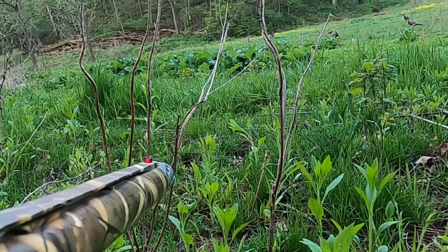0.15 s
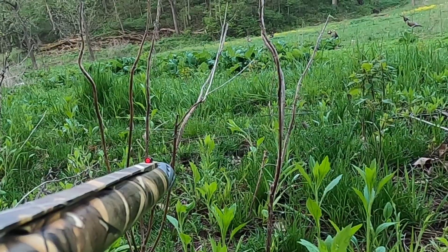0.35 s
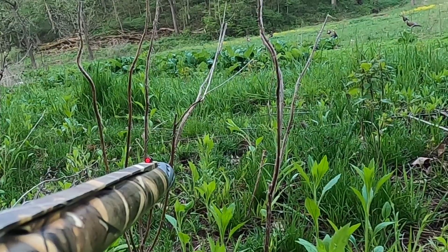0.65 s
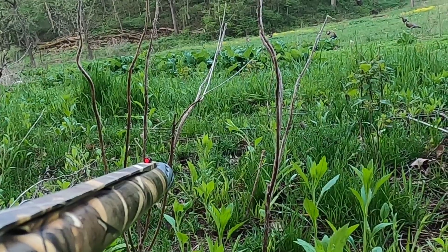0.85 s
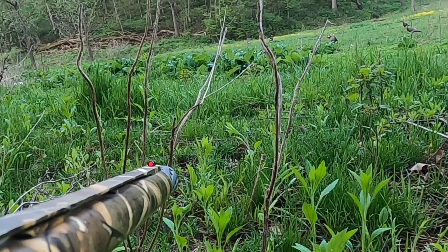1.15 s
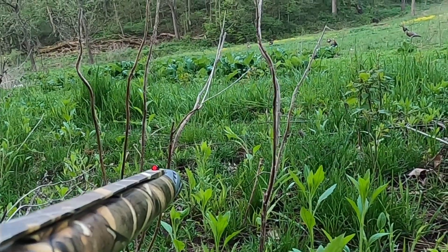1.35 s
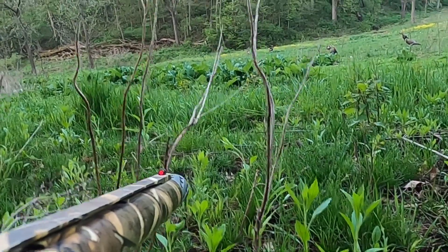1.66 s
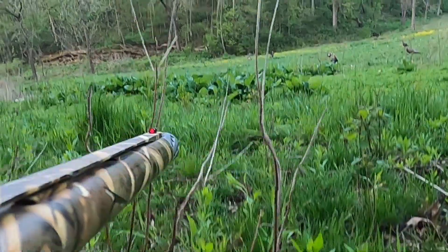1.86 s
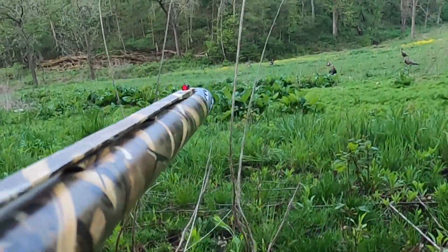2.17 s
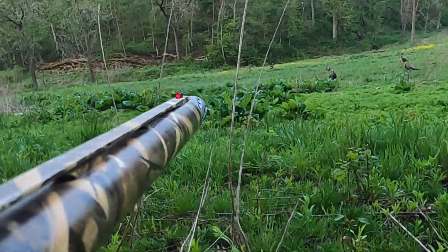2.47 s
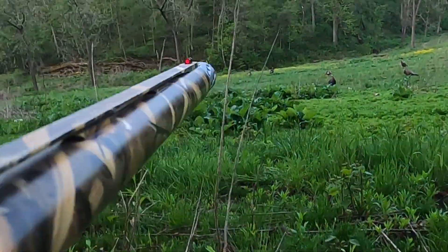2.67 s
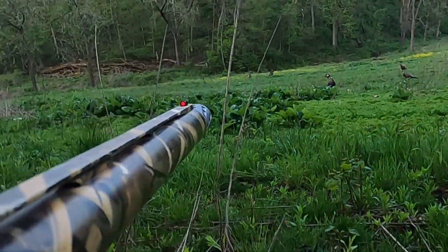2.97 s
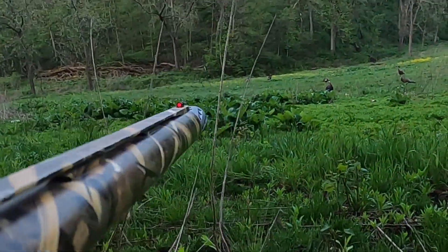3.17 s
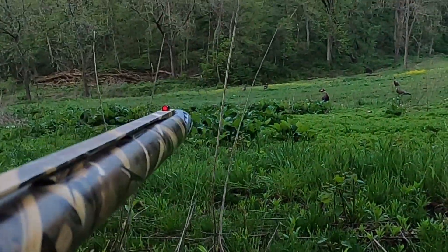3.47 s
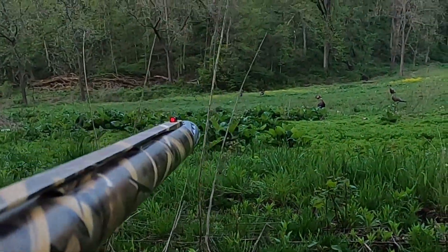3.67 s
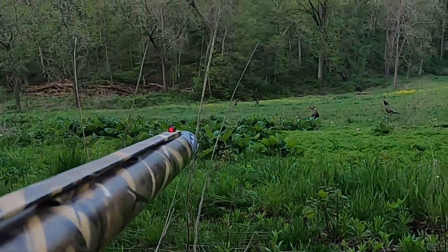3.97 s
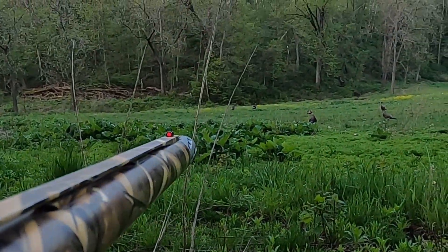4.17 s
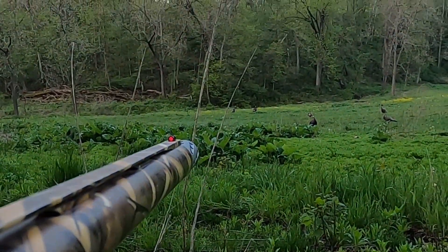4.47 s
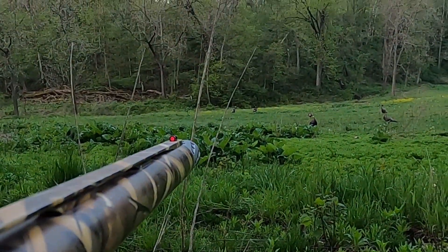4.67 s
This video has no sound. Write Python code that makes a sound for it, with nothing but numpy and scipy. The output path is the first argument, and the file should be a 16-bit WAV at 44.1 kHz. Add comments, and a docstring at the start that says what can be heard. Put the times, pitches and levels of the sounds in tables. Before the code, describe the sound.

A lively dawn chorus: one loud bird repeats quick syllables in the first second, another answers more faintly, and fluting whistles carry on throughout, echoing off trees. Close to the microphone, a gun slides and bumps softly between roughly two and three and a half seconds, then a bright, short metal click snaps at four seconds. No shot follows; birdsong continues in wide stereo.

```python
"""Songbirds whistle, chirp and buzz over a distant chorus and still air at dawn, by a wooded field;
a turkey gobbles faintly far off. Close by, a shotgun rubs and knocks as it is raised, then clicks.
Birds are gliding tones or bands of noise; sparse random echoes stand for the trees.
Rubs are grainy noise, part of it ringing the gun's low modes; knocks are dulled rings of its modes.
The click adds a noise crack, a bright steel ring and a low ring of the whole gun."""
import sys
import numpy as np
from scipy import signal
from scipy.fft import rfft, irfft
from scipy.io import wavfile

SR = 44100
rng = np.random.default_rng(int(sys.argv[2]) if len(sys.argv) > 2 else 0)


def inscribe(sig):
    """Save sig as 16-bit PCM at rate SR to the path in sys.argv[1].

    A 1-D sig is mono; a 2-D sig holds one channel per row.
    Samples are clipped to [-1, 1] before scaling.
    """
    pcm = np.round(np.clip(np.atleast_2d(sig).T, -1, 1) * 32767)
    wavfile.write(sys.argv[1], SR, pcm.astype(np.int16))


N = 212606
TIME_S = np.arange(N) / SR
RIGHT_LEAD_SAMPLES = 5  # far sound
EDGE_HZ = 13900
CHIRP_LENGTH_S, RASP_HZ = 0.032, 12830

# Event levels are relative: gains shared by a whole source come on top.
# Single notes, start and end over middle pitch. name: (start_ratio, end_ratio)
SHAPES = {"held": (1.008, 1), "sag": (1.035, .94), "scoop": (1.085, 1.0), "dip": (1.035, 1.045),
          "fall": (1.15, .88), "rise": (.89, 1.1), "dive": (1.23, .81), "flick": (0.75, 1.2)}
# Thin slurs from the open field: start_s, length_s, pitch_hz, level_db, left_minus_right_db, shape
SLURS = [(.003, 0.052, 3570, -51, 6.5, "fall"), (0.281, .04, 3940, -59, 7, "held"),
         (0.069, 0.28, 4874, -60.5, 12, "held"), (.225, .026, 6980, -66, -7, "dive"),
         (.088, 0.056, 7320, -56, 3, "scoop"), (0.162, 0.1, 6800, -64.5, -15, "fall"),
         (0.553, 0.032, 6800, -57.5, 15, "rise"), (0.561, .14, 8310, -77, -2, "held"),
         (0.888, .12, 6430, -72, 15, "sag"), (1.084, 0.053, 7710, -77.5, 2, "held"),
         (1.204, 0.017, 4350, -52, -9, "rise"), (1.24, 0.056, 5860, -68.5, 10.5, "rise"),
         (1.415, .047, 5622, -62, 10, "rise"), (2.017, .12, 4540, -70, 20.5, "flick"),
         (2.02, .08, 5460, -68, -9, "rise"), (2.443, .06, 5820, -69, 8, "sag"),
         (2.438, .09, 4210, -70, 10, "dip"), (3.026, .11, 4140, -66, 11, "scoop"),
         (3.931, .025, 4680, -67, -15, "fall"), (3.99, 0.077, 7680, -74, 9, "rise"),
         (4.097, 0.13, 7560, -72.5, 0, "rise")]
# Fluting carol: start_s, length_s, pitch_hz, level_db, shape
CAROL = [(.06, 0.2, 2853, -58, "scoop"), (0.106, 0.1146, 1918, -63.5, "held"),
         (0.35, 0.052, 2245, -56.5, "dip"), (.565, .063, 3140, -54.5, "held"),
         (0.634, 0.15, 2245, -53.5, "scoop"), (.8, .065, 2446, -50, "sag"), (1.14, .08, 1673, -68, "rise"),
         (1.165, 0.029, 2230, -56.5, "rise"), (1.201, 0.095, 2045, -55.5, "scoop"),
         (1.301, 0.026, 1797, -56, "rise"), (1.413, 0.056, 1560, -65.5, "fall"),
         (1.524, 0.054, 2370, -50.5, "scoop"), (1.642, 0.05, 3080, -52, "held"),
         (1.691, 0.064, 2513, -58.5, "fall"), (1.762, 0.073, 2155, -51.5, "held"),
         (1.79, .05, 1880, -63.5, "sag"), (1.789, .07, 3065, -53.5, "held"),
         (1.877, 0.044, 2680, -56, "held"), (1.955, .03, 2130, -58.5, "dip"),
         (1.998, 0.055, 2546, -54, "scoop"), (2.03, .13, 1483, -70, "dip"),
         (2.359, 0.055, 2650, -54, "sag"), (2.409, 0.061, 2330, -52.5, "sag"),
         (2.533, 0.034, 2217, -54, "sag"), (2.597, .06, 3470, -61, "held"),
         (2.755, 0.038, 2456, -52, "scoop"), (2.839, 0.032, 3370, -50.5, "scoop"),
         (2.947, 0.059, 2592, -52, "fall"), (3.012, .045, 2670, -54, "rise"),
         (3.109, 0.062, 2230, -54.5, "held"), (3.283, 0.078, 2850, -46.5, "held"),
         (3.341, 0.035, 2990, -53.5, "sag"), (3.393, 0.071, 2975, -49, "scoop"),
         (3.467, .038, 3240, -44.5, "sag"), (3.502, 0.044, 2724, -41.5, "scoop"),
         (3.61, 0.041, 2430, -51, "scoop"), (3.611, .1, 1902, -52, "rise"), (3.797, 0.11, 3950, -49, "sag"),
         (3.739, 0.1, 1935, -62, "held"), (3.799, 0.069, 2595, -42.5, "dip"),
         (3.889, 0.043, 3540, -40, "held"), (3.964, 0.075, 2373, -54, "dip"),
         (4.085, 0.045, 3230, -45, "dip"), (4.145, 0.074, 3145, -50, "held"),
         (4.172, 0.067, 2370, -53.5, "scoop"), (4.275, 0.1, 2098, -56, "dip"),
         (4.391, 0.05, 2545, -56, "dip"), (4.476, .055, 2964, -54, "held"),
         (4.525, 0.055, 2570, -55.5, "sag"), (4.583, .05, 2910, -56, "held"),
         (4.667, 0.071, 2650, -56, "scoop"), (4.731, 0.043, 2250, -57.5, "rise"),
         (4.793, 0.033, 2430, -54, "scoop")]
# Quick chirps: start_s, pitch_hz, level_db, left_minus_right_db, shape
CHIRPS = [(0.111, 3210, -57.5, 13, "rise"), (0.751, 1750, -63, 12.5, "rise"),
          (2.489, 2583, -60.5, 15, "fall"), (2.727, 3020, -51.5, 1, "dive"),
          (3.095, 3300, -59, 16, "flick"), (3.12, 3297, -52.5, 13, "dive"),
          (3.241, 1620, -63.5, -2, "fall"), (3.29, 1820, -64, -1.5, "scoop"),
          (3.652, 3380, -56.5, 10.5, "dive"), (3.863, 3130, -47, 6, "flick")]
# Songs of repeated syllables: first_s, repeats, period_s, length_s, start_hz, middle_hz, end_hz,
# level_db, change_db_per_repeat
# Loud bird among the trees
LOUD_SONG = [(0.51, 2, .143, 0.016, 8650, 5440, 4100, -57, -2.5),
             (0.4, 2, 0.12, .028, 7600, 4900, 3400, -49.5, -11.5),
             (.5, 2, 0.12, 0.022, 4400, 4100, 3100, -46, -2),
             (.675, 4, 0.14, 0.046, 2430, 3450, 3700, -49, 0),
             (.74, 3, .1365, .017, 5820, 5000, 3750, -46, -1.5),
             (.762, 3, 0.13, 0.023, 5700, 3900, 3060, -47, 1.5),
             (0.44, 3, .135, 0.01, 5950, 6600, 4200, -49, -9),
             (.79, 3, .1365, .018, 5200, 4500, 3600, -55, 0),
             (.47, 2, .06, 0.03, 2900, 5000, 4030, -55.5, -2.5),
             (1.14, 3, 0.081, 0.027, 4760, 3480, 2850, -51, -0.5)]
# Second bird, a like song from the open; same columns
ANSWER_SONG = [(1.143, 2, .16, .012, 7450, 6206, 4860, -72, 1.5),
               (1.163, 2, .227, 0.032, 6850, 6140, 5070, -73.5, -0.5),
               (1.487, 1, 0, 0.025, 7390, 5008, 4000, -61, 6),
               (1.545, 4, .128, 0.06, 6540, 4780, 3720, -67, -1),
               (1.592, 2, 0.096, 0.019, 3725, 4510, 4740, -56, 0.5),
               (1.748, 3, .1245, 0.012, 7170, 5145, 3350, -62, 0.5),
               (1.815, 3, .126, 0.023, 3270, 3875, 4020, -59.5, 1),
               (2.122, 4, .0835, .025, 4307, 3385, 2560, -64.5, 1.5)]
# Third bird, one even trill; same columns
EVEN_TRILL = [(.39, 6, .058, 0.032, 6250, 4656, 3860, -58, 0.021)]
# Distant chorus, level over time: time_s, level_db
CHORUS_LEVEL = [(0.0, -54.5), (0.59, -64), (0.87, -64.5), (1.19, -53.5), (1.53, -60.5), (1.87, -55),
                (2.07, -57.5), (3.36, -55.5), (3.46, -55), (4.07, -48.5), (4.28, -55), (4.82, -58.5)]
# Chorus spectrum: freq_hz, gain_db
CHORUS_COLOUR = [(1000, -41.5), (1500, -22.5), (1900, -8.5), (2300, -0.5), (2900, 2), (3500, -3.5),
                 (4500, -13), (7000, -47), (9000, -55)]
# Buzzy phrases: start_s, length_s, centre_hz, width_hz, level_db
BUZZES = [(0, 0.13, 5800, 1290, -59), (0.063, 0.33, 5030, 1200, -56), (0.021, 0.5, 3500, 600, -59),
          (0.207, 0.083, 7500, 620, -64), (0.274, 0.27, 5300, 1320, -63), (0.535, 0.12, 6940, 558, -57.5),
          (2.617, 0.18, 6140, 1110, -73.5), (2.973, .26, 6770, 446, -75.5), (3.233, 0.12, 1710, 250, -70),
          (3.839, 0.21, 7220, 837, -70), (4.071, .24, 6100, 1390, -65.5)]
# Faint, very high rasps: middle_s, level_db
RASPS = [(1.9, -72), (2.13, -72), (2.29, -70), (2.43, -68.5), (2.97, -67.5), (3.14, -68), (3.39, -71),
         (4.412, -72.5), (4.59, -70.5), (4.82, -74)]
# Still air spectrum: freq_hz, level_db_per_hz
AIR_COLOUR = [(20, -22.5), (50, -3), (100, -11.5), (165, 6.5), (250, -1), (500, -8), (900, -11.5),
              (1500, -5.5), (3000, -9), (5000, -12), (7000, -20.5), (9000, -27), (12000, -44.5),
              (14000, -42.5)]
# Likeness of the two channels for far sound: freq_hz, likeness_0_to_1
LIKENESS = [(30, 0), (150, 0), (1000, 0.12), (2500, 0), (4000, 0), (8000, 0)]
# Low modes of the gun and its mount: freq_hz, level_db, t60_s
BODY_MODES = [(111.3, -23, 0.39), (164, -20, 0.14), (235, -35, .13), (273, -11.5, 0.14), (423, -17, 0.14),
              (480, -2, 0.09), (569.4, 1, 0.084), (696.4, -2, 0.089), (826, -8, 0.099), (1031, 5.5, 0.052)]
# Bright modes of the steel parts: freq_hz, level_db, t60_s
STEEL_MODES = [(1477, -7.5, 0.097), (2060, 0, 0.027), (2147, 10, 0.016), (3180, 1, 0.014),
               (3530, -3.5, 0.017), (4720, -14, 0.021), (5820, -14, 0.016), (6880, -16, 0.022),
               (7620, -31, 0.013), (8690, -18, 0.0147), (10400, -34, 0.0047)]
# Stereo balance of the gun: freq_hz, left_minus_right_db
GUN_BALANCE = [(60, 17.5), (110, -3.5), (200, -8.5), (370, -10.5), (680, -7), (1240, 4), (2270, -2),
               (4170, 23), (7000, 23), (8600, 0), (12000, 2.5)]
# Gun sliding on its rest: full_pressure_s, swell_s, hold_s, level_db
STROKES = [(0.054, 0.15, 0.1, -66.5), (1.296, .06, 0.083, -70), (1.846, 0.053, .025, -56.5),
           (2.225, 0.018, 0.0063, -73), (2.545, 0.048, 0.094, -50.5), (2.955, 0.14, 0.068, -50.5),
           (3.408, 0.028, .02, -57.5), (3.577, .12, 0.037, -59.5)]
SWELL_DB, STROKE_FALL_DB_PER_S = 18.5, 181  # rise over one swell_s; fall after the hold
LIFT_CREEP = (1.8, 0.45, 1.85, -71.5)  # soft creep while raised; columns as STROKES
# Rub spectrum: freq_hz, level_db_per_hz
RUB_COLOUR = [(30, -8.5), (110, -13), (180, -17.5), (280, 5.5), (370, -11), (490, 5), (600, 0),
              (800, -28.5), (1100, -6), (1600, -17), (3000, -13), (8000, -46)]
# Sleeve brushing as the arm lifts, level over time: time_s, level_db
SLEEVE_LEVEL = [(1.5, -81.5), (1.9, -70), (2.25, -76.5), (2.55, -85), (2.85, -68), (3.15, -77),
                (3.45, -72.5), (3.65, -101)]
# Soft handling knocks: start_s, level_db, lowpass_hz
KNOCKS = [(2.226, -49, 200), (2.372, -50.5, 2000), (2.55, -43, 594), (2.576, -42, 513), (3.411, -38, 1450),
          (3.462, -46.5, 1500)]
# Dull bumps of the mount: start_s, level_db, pitch_hz
BUMPS = [(2.091, -44.5, 43.7), (2.223, -40, 212), (2.237, -53, 150), (2.239, -57, 54.4), (2.569, -46, 68),
         (2.77, -57.5, 38.8), (2.938, -48.5, 37.2)]
# Catch snaps over, chatters and seats: start_s, level_db
CLICK = [(4.0499, 0), (4.0506, -17.5), (4.0516, -14)]
# Crack of steel on steel, spectrum: freq_hz, level_db_per_hz
CRACK_COLOUR = [(500, -19.5), (1000, -3.5), (1300, -14), (1500, 0.5), (1750, -6.5), (2150, -4.5),
                (2700, -4), (3400, -10), (4500, -19.5), (7000, -18), (9000, -26), (11000, -31.5),
                (14000, -44)]


def gain_of(db):
    """Decibels to amplitude gain."""
    return 10 ** (np.asarray(db) / 20)


def evened(x):
    """Scale to rms 1."""
    return x / np.sqrt(np.mean(x ** 2) + 1e-20)


def read(points, hz):
    """Interpolate a curve on a log-frequency axis."""
    f, value = np.transpose(points)
    return np.interp(np.log(hz + 1), np.log(f + 1), value)


def add(mix, start_s, sound):
    """Add a stereo sound in place, cropped at the end of the mix."""
    part = mix[:, max(round(start_s * SR), 0):][:, :sound.shape[1]]
    part += sound[:, :part.shape[1]]


def panned(balance_db):
    """Left and right gains, half the balance on each side."""
    left_db = np.atleast_1d(balance_db)
    return gain_of(np.array([left_db, -left_db]) / 2)


def coloured(x, gain):
    """Filter by a gain given as a function of frequency."""
    size = x.shape[-1]
    return irfft(rfft(x) * gain(np.fft.rfftfreq(size, 1 / SR)), size)


def bell(centre_hz, width_hz):
    """Gaussian band as a gain function of frequency."""
    return lambda f: np.exp(-.5 * ((f - centre_hz) / width_hz) ** 2)


def wander(size, rate_hz):
    """Smooth random motion: lowpassed noise, rms near 1."""
    noise = rng.standard_normal(size + 8192)
    return evened(coloured(noise, lambda f: np.exp(-(f / rate_hz) ** 2)))[:size]


def without_bass(x, edge_hz):
    """Highpass: small parts cannot radiate low frequencies."""
    return signal.sosfilt(signal.butter(2, edge_hz, "highpass", fs=SR, output="sos"), x)


def from_field(pair):
    """Far sound: channels partly alike by frequency, the right one ahead."""
    a, b = rfft(pair)
    hz = np.fft.rfftfreq(pair.shape[1], 1 / SR)
    same = np.clip(read(LIKENESS, hz), 0, 1)
    right = same * a + np.sqrt(1 - same ** 2) * b
    right = right * np.exp(2j * np.pi * hz * RIGHT_LEAD_SAMPLES / SR)
    return irfft(np.array([a, right]), pair.shape[1])


def field_noise(size):
    """White noise with the stereo image of far sound."""
    return from_field(rng.standard_normal((2, size)))


def far_noise(gain):
    """Full-length far noise with a given spectrum, rms 1."""
    return evened(coloured(field_noise(N), gain))


def woods(x, t60_s, onset_s, balance_db, trunks_per_s=1500):
    """Trunks and leaves scatter a sound into sparse random echoes that swell and die."""
    t = np.arange(SR) / SR
    hits = rng.random(SR) < trunks_per_s / SR
    taps = np.sign(rng.standard_normal((2, SR))) * hits
    tail = from_field(taps * (1 - np.exp(-t / onset_s)) * gain_of(-60 * t / t60_s))
    tail /= np.linalg.norm(tail, axis=1, keepdims=True)
    mono = x.mean(0)[None]
    return signal.fftconvolve(mono, tail, axes=1)[:, :N] * panned(balance_db)


def carried(x, direct_db, near_db, tail_db, t60_s, balance_db, near_t60_s=0.092, near_trunks_per_s=260):
    """A bird arrives direct, doubled by nearby trunks, and as an echo of the wood."""
    near = woods(x, near_t60_s, onset_s=.002, balance_db=balance_db, trunks_per_s=near_trunks_per_s)
    tail = woods(x, t60_s, onset_s=0.0052, balance_db=balance_db)
    return gain_of(direct_db) * x + gain_of(near_db) * near + gain_of(tail_db) * tail


def sing(notes, waver, flutter_db, edge):
    """Near-pure tones on quadratic pitch glides, with random pitch waver and level flutter."""
    out = np.zeros((2, N))
    for start_s, length_s, start_hz, middle_hz, end_hz, level_db, balance_db in notes:
        size = int(max(length_s, .005) * SR * 1.1)
        u = np.linspace(-.05, 1.05, size)  # glide overhangs 5 % at each end
        hz = np.polyval(np.polyfit([0, .5, 1], [start_hz, middle_hz, end_hz], 2), u)
        turns = np.cumsum(hz * (1 + waver * wander(size, 210))) / SR
        taper = signal.windows.tukey(size, np.clip(edge, .1, 1))
        shape = evened(taper * gain_of(flutter_db * wander(size, 160)))
        right_turns = turns + hz * RIGHT_LEAD_SAMPLES / SR
        tone = np.sqrt(2) * np.sin(2 * np.pi * np.array([turns, right_turns]))
        add(out, start_s - length_s / 20, gain_of(level_db) * shape * tone * panned(balance_db))
    return out


def note(start_s, length_s, hz, level_db, balance_db, shape):
    """One note of a named shape around its middle pitch."""
    start_ratio, end_ratio = SHAPES[shape]
    return start_s, length_s, hz * start_ratio, hz, hz * end_ratio, level_db, balance_db


def runs(song, balance_db):
    """Each syllable repeats at a steady pace with a steady level step."""
    notes = []
    for first_s, repeats, period_s, length_s, start_hz, middle_hz, end_hz, level_db, change_db in song:
        for k in range(round(repeats)):
            notes.append((first_s + k * period_s, length_s, start_hz, middle_hz, end_hz,
                          level_db + k * change_db, balance_db))
    return notes


def scattered(low_hz, high_hz, level_db, spread_db, length_s, balance_db, count):
    """Stray notes of random shape, pitch, length and level, one per equal time slot."""
    notes, names = [], list(SHAPES)
    for k, (when, long, pitch, size, shape) in enumerate(rng.random((count, 5))):
        notes.append(note((k + when) / count * N / SR, length_s * (.5 + long),
                          low_hz * (high_hz / low_hz) ** pitch, level_db + spread_db * (size - .5),
                          balance_db, names[int(shape * len(names))]))
    return notes


def still_air():
    """Shaped noise with a slow level wander."""
    noise = far_noise(lambda f: gain_of(read(AIR_COLOUR, f)))
    return gain_of(-66) * noise * gain_of(.5 * wander(N, 5.4))


def chorus():
    """Many far birds: short glides blurred by the trees, over a soft noise wash."""
    count = 150
    when, length, pitch, bend, slope, size = rng.random((count, 6)).T
    start_s = (np.arange(count) + when) / count * N / SR
    hz, fall = 1800 + 1800 * pitch, .3 * (slope - .35)
    middle_hz = hz * (1 + 0.0972 * (bend - .5))
    notes = np.transpose([start_s, .03 + .07 * length, hz * (1 + fall), middle_hz, hz * (1 - fall),
                          8 * size, np.zeros(count)])
    colour = lambda f: gain_of(read(CHORUS_COLOUR, f))
    voices = sing(notes, waver=.008, flutter_db=3, edge=.6)
    glides = evened(coloured(woods(voices, t60_s=0.36, onset_s=0.0026, balance_db=6.0), colour))
    wash = gain_of(-3) * far_noise(colour) * panned(5)
    level_db = np.interp(TIME_S, *np.transpose(CHORUS_LEVEL))
    return gain_of(level_db - 1.5) * (glides + wash)


def buzzes():
    """Blurred trills: noise bands that swell, flutter and fade."""
    out = np.zeros((2, N))
    for start_s, length_s, centre_hz, width_hz, level_db in BUZZES:
        size = int(length_s * SR)
        band = coloured(field_noise(size), bell(centre_hz, width_hz))
        shape = signal.windows.tukey(size, .6) * gain_of(2 * wander(size, 70))
        add(out, start_s, gain_of(level_db) * panned(6.4) * evened(band * shape))
    return out


def far_birds():
    """Short stray notes, low, middle and high, blurred by the trees."""
    low = scattered(1413, 2107, level_db=-72, spread_db=5, length_s=0.043, balance_db=4.5, count=40)
    middle = scattered(2217, 3490, level_db=-63, spread_db=-1, length_s=.05, balance_db=7.5, count=36)
    high = scattered(4070, 6060, level_db=-76, spread_db=13, length_s=0.02, balance_db=4.5, count=90)
    voices = sing(low + middle + high, waver=0.0088, flutter_db=3.5, edge=0.29)
    return carried(voices, direct_db=1.5, near_db=-7.5, tail_db=-15, t60_s=0.39, balance_db=9)


def open_field_birds():
    """Thin slurs, an even trill and the second bird's song: gliding tones with tree echoes."""
    slurs = sing([note(*row) for row in SLURS], waver=0.0095, flutter_db=-3, edge=0.45)
    notes = runs(ANSWER_SONG, balance_db=19) + runs(EVEN_TRILL, balance_db=16)
    songs = sing(notes, waver=0.0096, flutter_db=0.0, edge=0.32)
    return carried(songs + slurs, direct_db=0.5, near_db=1.5, tail_db=-1.0, t60_s=1.0, balance_db=3.5)


def turkey():
    """Far gobble: a quick, uneven rattle of rough, falling notes, blurred by the trees."""
    start_s, pulses_per_s, pitch_hz, count = 0.018, 24, 1200, 5
    late, sharp = rng.standard_normal((count, 2)).T
    when_s = start_s + (np.arange(count) + 0.1474 * late) / pulses_per_s
    hz = pitch_hz * (1 + 0.056 * sharp)
    notes = [(s, .036, f * 1.08, f, f * .85, -63, 6) for s, f in zip(when_s, hz)]
    gobble = sing(notes, waver=0.053, flutter_db=6.5, edge=0.28)
    return woods(gobble, t60_s=.15, onset_s=.004, balance_db=7)


def ring(modes, lag_s):
    """Struck modes of the gun: decaying sines, the left channel late by lag_s."""
    t = np.arange(SR // 2) / SR
    since = np.maximum(np.array([t - lag_s, t]), 0)
    out = np.zeros_like(since)
    for hz, level_db, t60_s in modes:
        decay = gain_of(level_db - 60 * since / t60_s)
        out += decay * np.sin(2 * np.pi * hz * since) * panned(read(GUN_BALANCE, hz))
    return out


def pressure():
    """Strokes swell, hold and die away, power-summed with the slow creep of the lift."""
    power = np.zeros(N)
    for full_s, swell_s, hold_s, level_db in [*STROKES, LIFT_CREEP]:
        rise_db = SWELL_DB * np.maximum(full_s - TIME_S, 0) / swell_s
        fall_db = STROKE_FALL_DB_PER_S * np.maximum(TIME_S - full_s - hold_s, 0)
        power += gain_of(level_db - rise_db - fall_db) ** 2
    return np.sqrt(power)


def rubbing():
    """The stock slips in tiny grains that ring the gun's low modes; a sleeve hisses along."""
    grain = rng.standard_normal(N) * gain_of(2.5 * wander(N, 150))
    late_grain = np.interp(TIME_S - 0.00036, TIME_S, grain)
    pair = np.array([late_grain, grain]) + 1.8 * rng.standard_normal((2, N))
    colour = lambda f: gain_of(read(RUB_COLOUR, f)) * panned(read(GUN_BALANCE, f))
    scrape = evened(coloured(pair, colour))
    body = ring(BODY_MODES, lag_s=0.00041)
    hollow = evened(signal.fftconvolve(grain[None], body, axes=1)[:, :N])
    rub = (gain_of(-1) * scrape + gain_of(-5.5) * hollow) * pressure()
    cloth = far_noise(bell(6000, 2800)) * gain_of(1.2 * wander(N, 60.5))
    sleeve_db = np.interp(TIME_S, *np.transpose(SLEEVE_LEVEL), left=-120, right=-120)
    return rub + cloth * gain_of(sleeve_db)


def carol():
    """Fluting whistles: steady or gently bent tones with a slight waver."""
    notes = [note(start_s, length_s, hz, level_db, balance_db=7.5, shape=shape)
             for start_s, length_s, hz, level_db, shape in CAROL]
    whistles = sing(notes, waver=.005, flutter_db=1.8, edge=.5)
    return carried(whistles, direct_db=0, near_db=-10, tail_db=-4, t60_s=0.75, balance_db=5.5)


def chirps():
    """Quick glides of equal length."""
    notes = [note(start_s, CHIRP_LENGTH_S, *rest) for start_s, *rest in CHIRPS]
    voices = sing(notes, waver=0.013, flutter_db=-0.5, edge=0.5)
    return carried(voices, direct_db=2.5, near_db=1.5, tail_db=-11.0, t60_s=0.83, balance_db=9.5)


def loud_bird():
    """Repeated gliding syllables with strong echoes from the trees around."""
    song = sing(runs(LOUD_SONG, balance_db=12), waver=0.022, flutter_db=4.5, edge=0.54)
    return carried(song, direct_db=0, near_db=3.5, tail_db=1.5, t60_s=0.97, balance_db=6.5,
                   near_t60_s=0.13, near_trunks_per_s=170)


def rasps():
    """A narrow, very high hiss that spreads downward in the middle of each stroke."""
    out, t = np.zeros((2, N)), np.arange(-6000, 6000) / SR
    # centre_hz, width_hz, length_s, level_db
    parts = [(RASP_HZ, 240, 0.04, -2), (RASP_HZ - 950, 850, 0.023, -1)]
    for middle_s, level_db in RASPS:
        for centre_hz, width_hz, length_s, part_db in parts:
            band = evened(coloured(field_noise(len(t)), bell(centre_hz, width_hz)))
            swell = np.exp(-.5 * (t / length_s) ** 2)
            add(out, middle_s + t[0], gain_of(level_db + part_db) * band * swell)
    return out * panned(4.3)


def handling():
    """Raising the gun: knocks on its modes, and bumps that rock the two microphones out of step."""
    out = np.zeros((2, N))
    blow = ring(BODY_MODES, lag_s=0.00033) + gain_of(13) * ring(STEEL_MODES, lag_s=.0001)
    for start_s, level_db, lowpass_hz in KNOCKS:
        dulled = signal.lfilter(*signal.butter(2, lowpass_hz, fs=SR), blow)
        knock = without_bass(dulled, edge_hz=lowpass_hz / 4)
        add(out, start_s, gain_of(level_db + 2.5) * knock / abs(knock).max())
    for start_s, level_db, hz in BUMPS:
        t = np.arange(int(3 / hz * SR)) / SR  # three cycles
        rock = np.sin(2 * np.pi * hz * t + [[0], [np.pi / 2]])  # quarter cycle apart
        add(out, start_s, gain_of(level_db) * rock * np.hanning(len(t)) * panned(-1.2))
    return out


def click():
    """Steel snaps on steel: crack and bright ring, then the gun rings low and faintly rattles."""
    body_rise_s, steel_rise_s, crack_decay_s, rattle_decay_s = 0.0016, 0.00031, 0.0026, 0.053
    out, t = np.zeros((2, N)), np.arange(SR // 2) / SR
    steel = ring(STEEL_MODES, lag_s=.0001) * (1 - np.exp(-t / steel_rise_s))
    steel = without_bass(steel, edge_hz=2330)
    for start_s, level_db in CLICK:
        grit = evened(coloured(field_noise(len(t)), lambda f: gain_of(read(CRACK_COLOUR, f))))
        rattle_decay = gain_of(-31.5) * np.exp(-t / rattle_decay_s)
        crack = grit * (np.exp(-t / crack_decay_s) + rattle_decay)
        snap = gain_of(-17.0) * steel + gain_of(-15.5) * crack * panned(1.5)
        add(out, start_s, gain_of(level_db) * snap)
    body = ring(BODY_MODES, lag_s=0.00038) * (1 - np.exp(-t / body_rise_s))
    add(out, CLICK[0][0], gain_of(-26.5) * without_bass(body, edge_hz=28))
    return out


def scene():
    """Birds and still air in the field, the gun close by."""
    field = still_air() + chorus() + buzzes() + far_birds() + turkey()
    singers = open_field_birds() + carol() + chirps() + loud_bird() + rasps()
    gun = rubbing() + handling() + click()
    return field + singers + gun


def record(dry):
    """Band limit: linear-phase lowpass at EDGE_HZ."""
    lowpass = signal.firwin(255, EDGE_HZ, window=("kaiser", 8), fs=SR)
    return signal.oaconvolve(dry, lowpass[None], "same")


dry = scene()
out = record(dry)
inscribe(out)
```